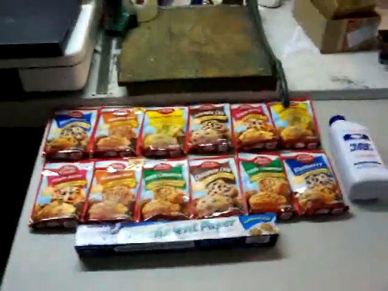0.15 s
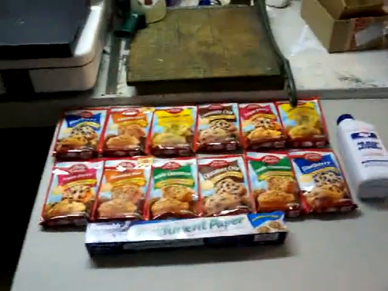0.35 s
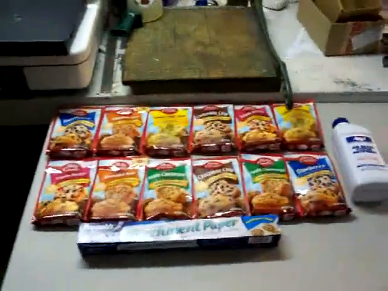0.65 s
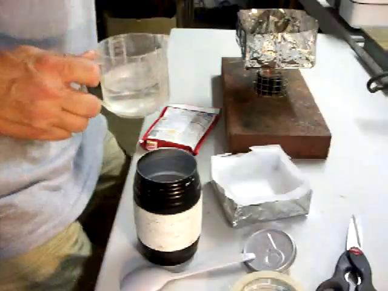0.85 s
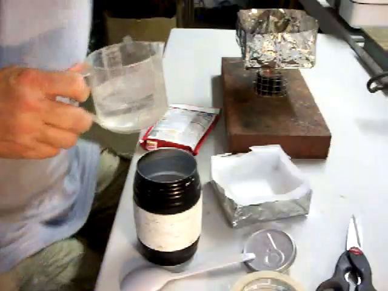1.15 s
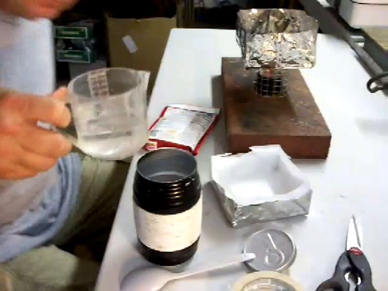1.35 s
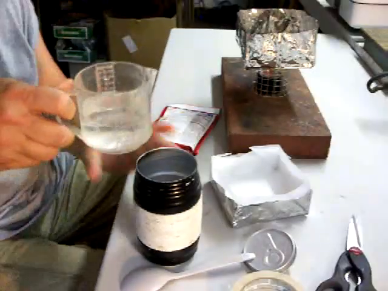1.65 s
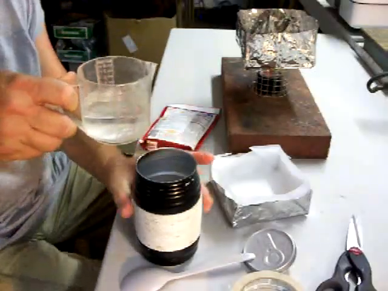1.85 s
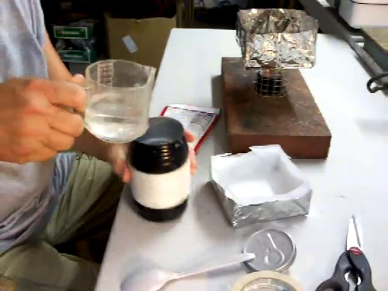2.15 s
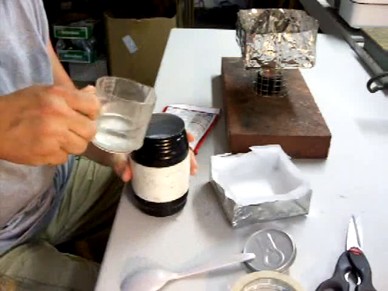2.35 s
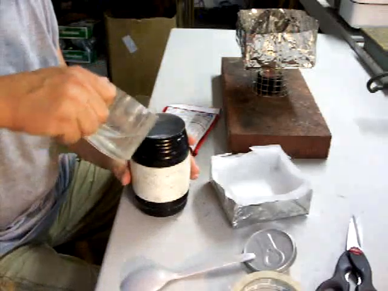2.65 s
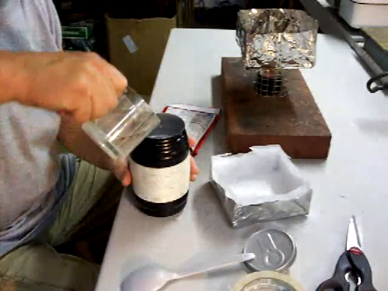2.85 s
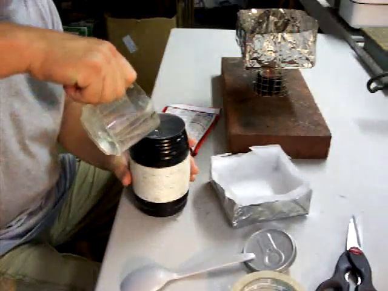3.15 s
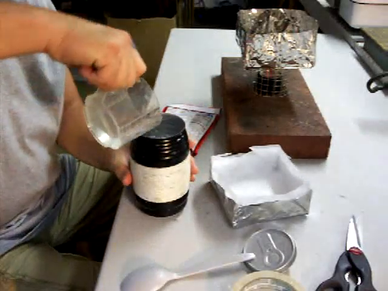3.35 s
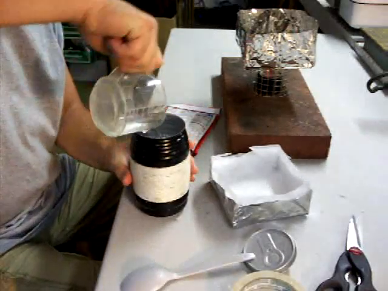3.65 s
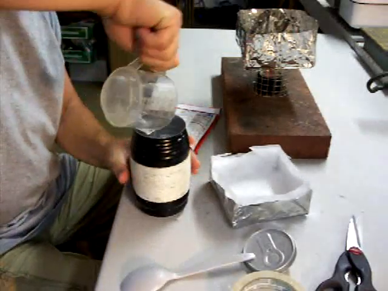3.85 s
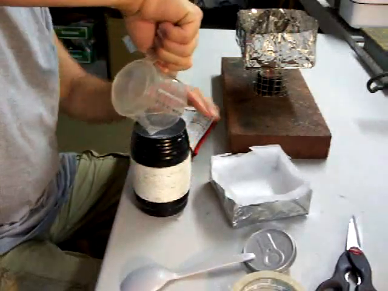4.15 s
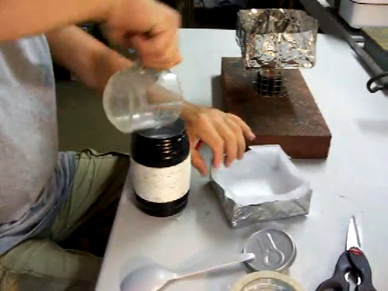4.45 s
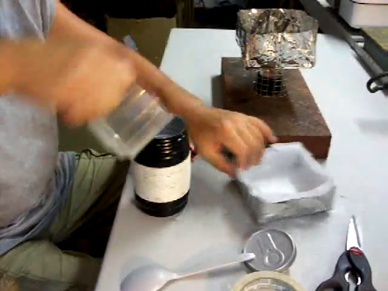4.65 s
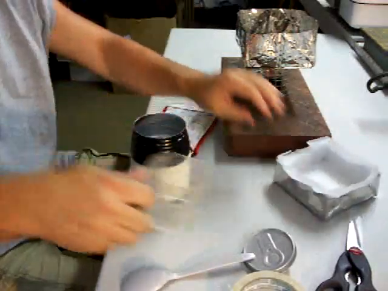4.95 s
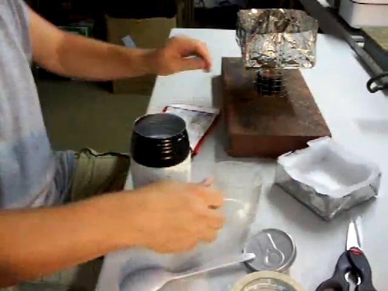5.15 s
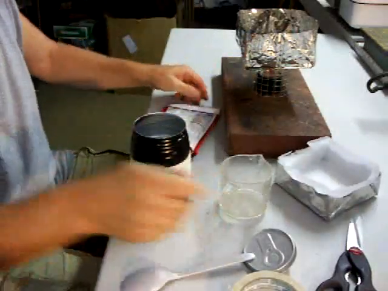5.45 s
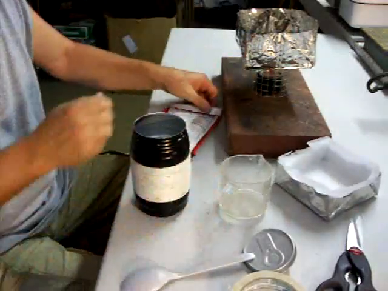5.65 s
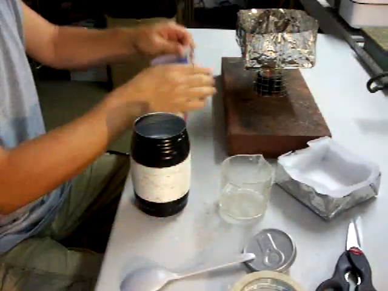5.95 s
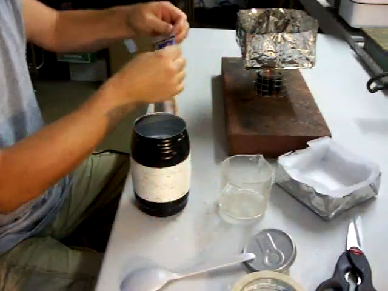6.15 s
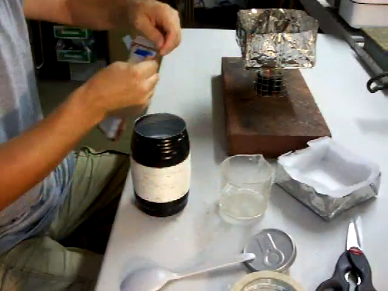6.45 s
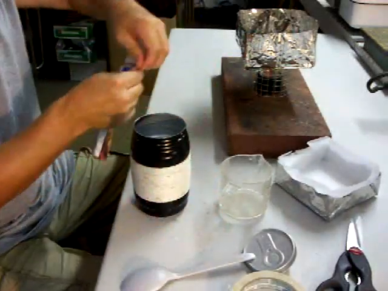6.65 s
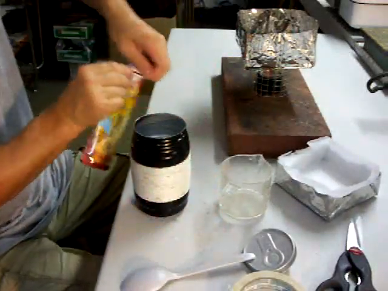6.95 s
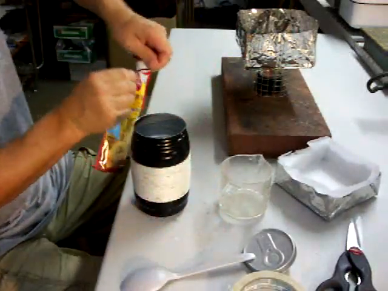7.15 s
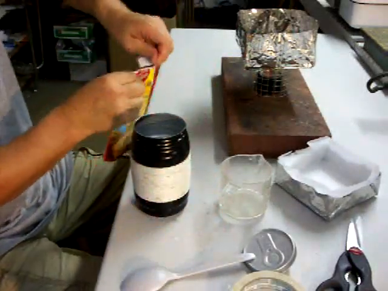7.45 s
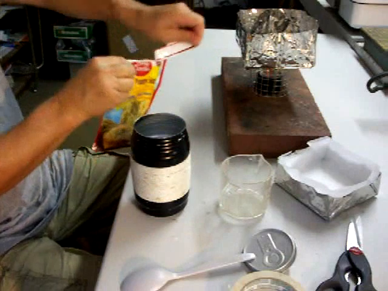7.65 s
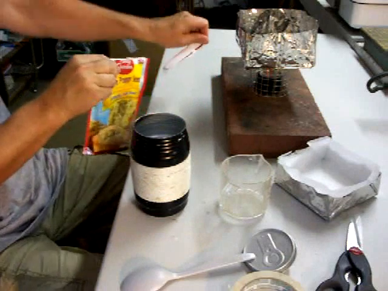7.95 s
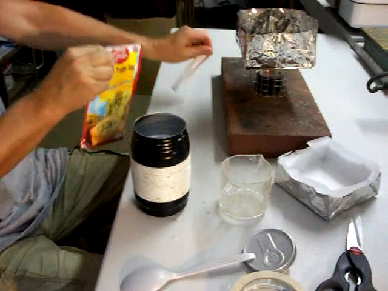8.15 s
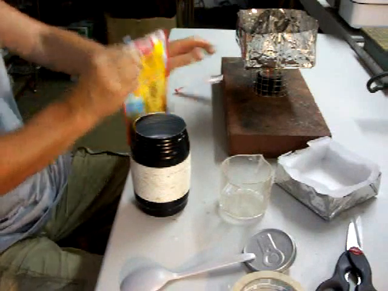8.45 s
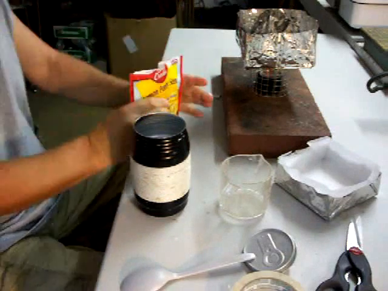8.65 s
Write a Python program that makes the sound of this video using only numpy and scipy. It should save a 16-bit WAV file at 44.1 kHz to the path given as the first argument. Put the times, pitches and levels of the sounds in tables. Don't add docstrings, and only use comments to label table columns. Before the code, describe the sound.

Over machine hum, a metal can scrapes and knocks on a table, water pours in, a foil pan scrapes, a plastic jug clatters down, a pouch tears.

```python
import sys
import numpy as np
from scipy import signal
from scipy.io import wavfile
from scipy.ndimage import uniform_filter1d

SR = 44100
rng = np.random.default_rng(int(sys.argv[2]) if len(sys.argv) > 2 else 0)


def volts_from_db(level):
    exponent = np.asarray(level, float) / 20
    return 10 ** exponent


def unload_audio(sound):
    columns = np.transpose(np.atleast_2d(sound))
    steps = np.round(np.clip(columns, -1, 1) * 32767)
    wavfile.write(sys.argv[1], SR, steps.astype(np.int16))


N = 387638
SCENE_CHANGE_S = .8005


def evened(x):
    return x / np.sqrt(np.mean(x ** 2) + 1e-20)


def add(mix, start_s, sound):
    part = mix[round(start_s * SR):][:len(sound)]
    part += sound[:len(part)]


def placed(start_s, sound):
    out = np.zeros(N)
    add(out, start_s, sound)
    return out


def coloured(x, spectrum):
    hz, db = np.transpose(spectrum)
    bins_hz = np.fft.rfftfreq(4096, 1 / SR)
    half = np.interp(np.log(bins_hz + 1), np.log(hz), db) * np.log(10) / 20
    log_gain = np.maximum(np.r_[half, half[-2:0:-1]], -11)
    phase = -signal.hilbert(log_gain).imag
    taps = np.fft.ifft(np.exp(log_gain + 1j * phase)).real
    return signal.oaconvolve(x, taps[:3000])[:len(x)]


def band(x, lo_hz, hi_hz, order=3):
    return signal.sosfilt(signal.butter(order, [lo_hz, hi_hz], "band", fs=SR, output="sos"), x)


def ring(hz, t60, size, rise=0.):
    t = np.arange(size) / SR
    return volts_from_db(-60 * t / t60) * np.sin(2 * np.pi * hz * t * (1 + rise * t / t60))


def rings(events, rise):
    out = np.zeros(N)
    for start_s, db, hz, t60 in events:
        add(out, start_s, volts_from_db(db) * ring(hz, t60, 9000, rise))
    return out


def grains(size, per_s, spread_db, cycles, rise, count):
    clumps = volts_from_db(2.2 * evened(uniform_filter1d(rng.standard_normal(size), 300)))
    heights = volts_from_db(spread_db * np.minimum(rng.exponential(1, size), 3.5))
    slips = heights * (rng.random(size) < per_s / SR) * clumps
    kind, out = rng.integers(0, count, size), np.zeros(size)
    for k, hz in enumerate(np.geomspace(180, 9500, count)):
        soft_start = np.minimum(np.arange(1500) * hz / SR * 4 / cycles, 1)
        template = ring(hz, 2 * cycles / hz, 1500, rise) * soft_start
        template *= np.sqrt(hz) / np.linalg.norm(template)
        out += signal.oaconvolve(slips * (kind == k), template)[:size]
    return evened(out)


def rubbing(rows, spectrum, split_hz, per_s, spread_db, cycles, smooth, rise=0., count=20):
    s, low_db, high_db = np.transpose(rows)
    t = np.arange(s[0], s[-1], 1 / SR)
    hiss = smooth * rng.standard_normal(len(t))
    body = coloured(grains(len(t), per_s, spread_db, cycles, rise, count) + hiss, spectrum)
    low = evened(band(body, 60, split_hz))
    high = evened(band(body, split_hz, 8130))
    both = volts_from_db(np.interp(t, s, low_db)) * low + volts_from_db(np.interp(t, s, high_db)) * high
    return s[0], both * signal.windows.tukey(len(t), 0.0029 / (s[-1] - s[0]))


def strokes(rows):
    s, db, bright_db, rise, fall = np.transpose(rows)[:, :, None]
    t = np.arange(np.floor(4 * s.min()) / 4 - .25, np.ceil(4 * s.max()) / 4 + .25, .001)
    force = volts_from_db(db - 20 * np.where(t < s, (s - t) / rise, (t - s) / fall))
    low = force.sum(0) + 1e-6
    high = (force * volts_from_db(bright_db)).sum(0) + 1e-6
    return np.c_[t, 20 * np.log10([low, high]).T]


def snaps(events, click_t60, fizz_db, width):
    out, t = np.zeros(N), np.arange(1500) / SR
    decay = volts_from_db(-60 * t / click_t60) + volts_from_db(fizz_db - 60 * t / 0.015)
    for (start_s, db, hz, low_db), noise in zip(events, rng.standard_normal((len(events), 1500))):
        burst = (noise + 5 * (t == 0)) * decay
        high = band(burst, hz / width, min(width * hz, 8300))
        low = band(burst, 790, 1300, order=1)
        add(out, start_s, volts_from_db(db) * (high / abs(high).max() + volts_from_db(low_db) * low / abs(low).max()))
    return out


def creases(events):
    rows = [(s, db - 2, hz, min(-38 - db, -10)) for s, db, hz in events]
    return snaps(rows, .008, -14, 1.6)


# time_s, gain_db
BACKGROUND_GAIN = [(0, 3), (.8, 3), (.81, 21), (2.2, 13.5), (3.0, 6), (5.3, 11), (5.7, 3), (6.6, -1),
                   (8.0, 6), (8.79, 5.5)]
# pitch_hz, density_db (per Hz)
AIR_BEFORE = [(15, -17), (25, -1), (166, -13.5), (220, -9.5), (283, -9.5), (1460, -20), (1660, -17.5),
              (1840, -21), (7370, -34.5), (10500, -49), (13600, -98)]
AIR_AFTER = [(15, -24), (25, 2.5), (70, -8), (150, -13.5), (194, -6.5), (276, -12), (1080, -19.5),
             (1660, -20), (1840, -23.5), (5870, -29), (10500, -45), (13600, -102.5)]
# pitch_hz, level_db
HUM_BEFORE = [(91.5, -45), (215.3, -42.5), (403.7, -47), (1620, -41.5), (2428, -54), (4290, -59),
              (5066, -63), (5120, -59.5)]
HUM_AFTER = [(72, -55), (189, -55.5), (346, -59), (435, -61.5), (1620, -56.5), (4290, -66.5)]


def workshop():
    t, out = np.arange(N) / SR, np.zeros(N)
    gain_db = np.interp(t, *np.transpose(BACKGROUND_GAIN))
    before = (AIR_BEFORE, -43.5, HUM_BEFORE, t < SCENE_CHANGE_S)
    after = (AIR_AFTER, -52, HUM_AFTER, t >= SCENE_CHANGE_S)
    for air, air_db, hum, on in (before, after):
        sound = volts_from_db(air_db) * evened(coloured(rng.standard_normal(N), air))
        for hz, hum_db in hum:
            waver = evened(uniform_filter1d(rng.standard_normal(N), 5000))
            level_db = hum_db - 4.0 + 0.65 * waver - 0.32 * gain_db * (hz > 1000)
            sound += volts_from_db(level_db) * np.sin(2 * np.pi * hz * t + 0.2 * np.roll(waver, 9000))
        out += sound * on
    return out * volts_from_db(gain_db)


def room(x):
    t = np.arange(16000) / SR
    echoes = rng.choice([-1., 1.], len(t)) * (rng.random(len(t)) < .06) * (t > .003)
    low = band(echoes, 48, 2600, order=2) * volts_from_db(-60 * t / 0.22)
    high = band(echoes, 1280, 7000, order=2) * volts_from_db(-60 * t / 0.14)
    tail = low + high
    return signal.oaconvolve(x, tail / np.linalg.norm(tail))[:N]


# pitch_hz, density_db (per Hz)
CLOTH_SPECTRUM = [(59, -47), (100, -31.5), (145, 8), (1230, -3.5), (1440, -6), (1890, -4.5), (3600, -9),
                  (6580, -15), (9340, -20.5), (10500, -75), (13600, -96)]
# peak_s, force_db, brightness_db, rise_s, fall_s
SLEEVE_STROKES = [
    (1.2, -41.5, 5, 0.025, 0.15),
    (1.53, -40.5, 6, 0.087, 0.072),
    (1.6, -47.5, 10.5, 0.24, .012),
]


def sleeve():
    return placed(*rubbing(strokes(SLEEVE_STROKES), CLOTH_SPECTRUM, 1300, per_s=3600, spread_db=2.0,
                           cycles=6.2, smooth=1.2))


# peak_s, stand_db, hand_db, brightness_db, fall_s
CAMERA_SHOVES = [
    [(.801, -18, -28, 0.5, 0.1), (.866, -13.5, -25, -4, 0.22), (.93, -20, -34.5, 10.5, 0.018),
     (1.03, -26.5, -35.5, -2, 0.26), (1.37, -25, -31.5, -13, 0.15), (1.49, -38, -23, -15, 0.061),
     (1.55, -39, -51, 2, 0.19), (1.822, -31.5, -35, -5, 0.14)],
    [(8.631, -19, -15.5, 1.5, 0.019), (8.65, -29, -30.5, 5, 0.31)],
]


def camera():
    out = np.zeros(N)
    for rows in CAMERA_SHOVES:
        s, stand_db, hand_db, bright_db, fall = np.transpose(rows)
        rise = np.minimum(.25 * fall, .6 * (s - s[0])) + .0005
        at, rock_db, _ = strokes(np.c_[s, stand_db, 0 * s, rise, fall]).T
        sway_db = strokes(np.c_[s, stand_db - 3, 0 * s, rise, 2.0 * fall])[:, 1]
        t = np.arange(at[0], at[-1], 1 / SR)
        noise = rng.standard_normal(len(t) + SR)
        sway = evened(band(noise, 7, 22, order=2)[SR:])
        rock = evened(band(noise, 30, 77, order=2)[SR:])
        rock = evened(rock + 1.2 * evened(band(noise, 42, 54, order=1)[SR:]))
        add(out, at[0], volts_from_db(np.interp(t, at, sway_db)) * sway + volts_from_db(np.interp(t, at, rock_db)) * rock)
        hands = strokes(np.c_[s, hand_db, bright_db, rise, fall])
        add(out, *rubbing(hands, CLOTH_SPECTRUM, 1020, per_s=4000, spread_db=4.0, cycles=6, smooth=1.4))
    return out


# start_s, level_db, pitch_hz, slips
CREAK_EVENTS = [(0.801, -18.5, 1840, 1), (0.8448, -12, 1900, 5), (4.7341, -15, 2180, 2),
                (4.7533, -15.5, 1270, 1), (4.962, -21, 1360, 3), (6.19, -27.5, 1550, 4),
                (7.054, -23, 1500, 1), (7.074, -28, 1550, 2), (8.629, -16, 1420, 1)]


def creaks():
    slips = []
    for s, db, hz, count in CREAK_EVENTS:
        for k in range(round(count)):
            slips.append((s + k * .0082, db - 2 * k, hz, min(-22 - db, -3)))
    return snaps(slips, 0.051, -9, 1.15)


# start_s, level_db, pitch_hz
TICK_EVENTS = [(0.8482, -14.5, 3600), (0.8778, -23, 3800), (0.9285, -12, 3300), (1.0249, -18, 3100.0),
               (1.102, -27.5, 4500.0), (1.2004, -26, 2200.0), (2.108, -25, 4170), (2.2554, -30, 2200.0),
               (2.497, -27, 4560), (2.217, -30, 4500), (2.5566, -30, 4100.0), (2.6577, -34, 6400.0),
               (2.672, -29, 3900.0), (2.7478, -23.5, 4470), (2.7804, -33, 3600.0), (0.8088, -24, 3200),
               (4.2322, -25, 3600.0), (4.2763, -31, 3600.0), (4.293, -25, 3750)]


def ticks():
    return creases(TICK_EVENTS)


# pitch_hz, density_db (per Hz)
FILM_SPECTRUM = [(88, -70), (150, -14.5), (452, -5.5), (717, -8), (798, -6), (919, -6.5), (6610, -12),
                 (8640, -17.5), (10500, -18.5), (13600, -91)]
# peak_s, force_db, brightness_db, rise_s, fall_s
POUCH_STROKES = [(5.81, -44, -3, 0.012, 0.2), (5.884, -51, 13.5, 0.0053, 0.069),
                 (6.575, -57.5, 6, 0.033, 0.15), (6.79, -69, 5, .004, 0.066),
                 (6.942, -52.5, 20.5, 0.002, 0.018), (6.963, -32, 4.5, 0.0046, 0.081),
                 (7.052, -36, 2, 0.022, 0.26), (7.253, -43.5, 7, 0.0037, 0.059),
                 (7.55, -40, 0, 0.0026, 0.017), (7.685, -33.5, -0.5, 0.095, 0.25),
                 (7.9, -56, 22.5, 0.22, 0.093), (7.96, -32, -1, 0.0061, 0.021),
                 (8.412, -33.5, -6.5, 0.0015, 0.03), (8.517, -48, 4, 0.053, 0.14)]
# pitch_hz, density_db (per Hz)
DRAG_SPECTRUM = [(88, -59), (150, -27), (270, 4.5), (569, -3.5), (1100, 0), (1380, 8), (1800, -4),
                 (2970, -18.5), (5070, -11), (7360, -24), (10500, -20), (13600, -68)]
# peak_s, force_db, brightness_db, rise_s, fall_s
DRAG_STROKES = [(6.09, -34, -6.5, 0.094, 0.13), (6.155, -36, 8, 0.026, 0.094),
                (6.195, -38.5, 11, 0.06, 0.11), (6.382, -50.5, 1, 0.0098, 0.095)]
# start_s, level_db, pitch_hz
LIFT_SNAPS = [(5.96, -36, 1500), (5.7986, -23, 1800), (5.8368, -23, 2200.0), (5.864, -26, 5100.0),
              (5.8824, -5.5, 4650), (5.8824, -18, 1600), (6.153, -21, 4900.0), (6.1718, -15, 4700.0),
              (6.1852, -9.5, 5600.0), (6.199, -18, 5400.0), (6.2072, -18, 5600.0), (6.2162, -17, 5000.0),
              (6.2328, -17, 4600.0), (6.242, -11, 4700.0), (6.2534, -19, 4600.0), (6.2602, -11, 4700.0),
              (6.2666, -16, 4700.0), (6.3183, -26, 2900.0), (6.3279, -16, 4400.0), (6.381, -28.0, 3720),
              (6.3953, -22.5, 3430)]
TORN_SNAPS = [(6.786, -35, 4470), (6.9404, -18, 4000), (6.9612, -7.5, 4400), (6.9726, -21, 5800),
              (6.99, -17, 6800.0), (7.0174, -25, 5000.0), (7.0433, -29, 2600.0), (7.0543, -16.5, 2200.0),
              (7.0738, -25, 5000), (7.1048, -12.5, 4700), (7.121, -18, 2200.0), (7.1318, -6.5, 3750),
              (7.2115, -28, 5000.0), (7.2175, -27, 4900.0), (7.252, -23, 2500.0), (7.2606, -15.5, 5270),
              (7.339, -33, 2600.0), (7.5507, -31.0, 2200.0), (7.5939, -28, 4400.0), (7.6057, -29, 3700.0),
              (7.618, -20, 2200.0), (7.6332, -12, 5800.0), (7.66, -33, 2200.0), (7.6794, -17, 4300.0),
              (7.687, -20, 4100.0), (7.6986, -14, 4800.0), (7.7181, -18, 4300.0), (7.7353, -18, 4500.0),
              (7.7482, -12.5, 7600.0), (7.7839, -17, 6200.0), (7.79, -19, 5700.0), (7.196, -25, 2000),
              (7.8448, -35, 3100.0), (7.853, -27, 4100.0), (7.901, -21, 6400.0), (7.9334, -17, 2080),
              (7.9596, -9, 5070), (8.129, -28, 4460), (8.321, -29, 4570), (8.4117, -26.5, 2200.0),
              (8.491, -27, 5200.0), (8.5222, -33, 6100.0), (8.5984, -30, 2200.0), (8.646, -7, 4000.0),
              (8.6739, -14, 3200.0), (8.6907, -15, 4300.0)]


def pouch():
    out = placed(*rubbing(strokes(DRAG_STROKES), DRAG_SPECTRUM, 2470, per_s=2900, spread_db=1.0,
                          cycles=3.8, smooth=1.3))
    add(out, *rubbing(strokes(POUCH_STROKES), FILM_SPECTRUM, 2020, per_s=3000, spread_db=2.5,
                      cycles=4.9, smooth=.8))
    return out + creases(LIFT_SNAPS) + creases(TORN_SNAPS)


# pitch_hz, density_db (per Hz)
PAN_SPECTRUM = [(60, -43), (134, -13), (222, -1), (300, -7.5), (1150, -8.5), (1330, 6), (1560, -3.5),
                (2150, -5.5), (2370, -2), (2700, -9), (4100, -8.5), (5800, -7.5), (7000, -11.5),
                (9200, -13.5), (13600, -79)]
# peak_s, force_db, brightness_db, rise_s, fall_s
PAN_STROKES = [(4.53, -59.5, 13, .08, .08), (4.64, -40.5, 7, 0.058, 0.23), (4.75, -32.5, 11.6, 0.082, 0.22),
               (4.887, -29, 5.5, 0.0073, 0.046), (4.975, -24, 0.4, 0.12, 0.15)]
# start_s, level_db, pitch_hz
PAN_SNAPS = [(4.4861, -28, 5000.0), (4.5354, -27, 5600.0), (4.6301, -38, 2300.0), (4.684, -20, 4000.0),
             (4.696, -14, 2200.0), (4.7402, -8.5, 2400.0), (4.753, -8, 5800.0), (4.8398, -8, 6200),
             (4.848, -12, 2200.0), (4.8684, -7, 5900.0), (4.8875, -3, 5800), (4.896, -7, 5800),
             (4.905, -5.5, 4600.0), (4.923, -22, 6800.0), (4.939, -9, 6200.0), (4.9543, -16, 2130),
             (4.9624, -9.5, 2200.0), (4.9745, -7, 5600), (5.0085, -13, 6000), (5.018, -18, 6000),
             (5.0579, -23, 6000)]


def foil_pan():
    scrape = rubbing(strokes(PAN_STROKES), PAN_SPECTRUM, 590, per_s=2600, spread_db=1.5, cycles=6, smooth=1.1)
    return placed(*scrape) + creases(PAN_SNAPS)


# pitch_hz, density_db (per Hz)
SPRAY_SPECTRUM = [(180, -6.5), (300, -22), (404, -14.5), (544, -12.5), (690, -18), (1090, -15.5),
                  (2300, -8), (4110, -9.5), (6620, -9.5), (9050, -11.5), (10500, -19), (13600, -78)]
# time_s, spray_db
STREAM = [(3.057, -79), (3.12, -48), (3.335, -43.5), (3.38, -37.5), (3.55, -37.5), (3.75, -35),
          (3.88, -41.5), (3.93, -32.5), (4.05, -42), (4.17, -40.5), (4.23, -56), (4.35, -55)]


def spray():
    s, spray_db = np.transpose(STREAM)
    air_db = -51 + .3 * (spray_db - spray_db.max()) + 7 * (s - s[0])
    return placed(*rubbing(np.c_[s, air_db, spray_db], SPRAY_SPECTRUM, 1100, per_s=5000, spread_db=2.7,
                           cycles=44, smooth=.7, rise=.1, count=70))


# start_s, level_db, pitch_hz
DROP_BUBBLES = [(3.1144, -29, 7480), (3.1306, -31.5, 3660), (3.39, -31.5, 1720), (3.1706, -23, 7490.0),
                (3.2031, -26.5, 4120), (3.2056, -34, 4960), (3.347, -23.5, 5740), (3.3478, -27.5, 4940),
                (3.3728, -28.0, 5730.0), (3.3738, -27.0, 3620), (3.3743, -33, 4850), (3.3877, -31, 4260.0),
                (3.388, -28, 5470), (3.4089, -29, 2140), (3.4192, -19.5, 6460), (3.4354, -27.0, 3150),
                (3.4356, -24, 7450), (3.4417, -23.5, 5540), (3.4556, -32, 2830), (3.51, -33, 2400),
                (3.4695, -22.5, 7180), (3.4705, -22.5, 5640.0), (3.503, -26.5, 2960), (3.5389, -29, 5940.0),
                (3.5393, -27, 7130), (3.562, -26, 3750), (3.571, -34, 1750), (3.5718, -32, 2480),
                (3.5728, -25, 5250.0), (3.5923, -24, 6400), (3.5928, -27, 5130), (3.5933, -26, 2970.0),
                (3.6102, -23.5, 6600), (3.6312, -25, 5800), (3.633, -33, 4700), (3.6357, -29, 2150.0),
                (3.6426, -33, 3370), (3.687, -26, 6700), (3.697, -27.5, 1830), (3.7584, -28, 6030),
                (3.788, -31, 4300), (3.8038, -31, 2760.0), (3.8242, -26.0, 6140), (3.9016, -35, 6700),
                (3.9023, -22.5, 4730), (3.9055, -30, 5940.0), (3.914, -25.5, 7070), (3.915, -31, 1880),
                (3.918, -26, 5940), (3.9255, -30, 2320), (4.0874, -31, 4690.0), (4.1716, -34, 1820),
                (4.1183, -19, 3320), (4.1455, -30, 5200), (4.146, -29, 7110.0), (4.1685, -28.5, 3330)]
# start_s, level_db, pitch_hz
LARGE_BUBBLES = [(3.352, -30, 2750), (3.455, -33, 2700), (3.5987, -35, 1900), (3.67, -32, 1250),
                 (3.8448, -29, 1440), (3.877, -30, 1390), (3.955, -28, 2800), (3.97, -30, 1890),
                 (4.0038, -26.5, 1550), (4.075, -26, 1940)]


def splashes():
    out = np.zeros(N)
    soft = np.minimum(np.arange(3000) / SR / .001, 1)
    for (start_s, db, hz), chance in zip(DROP_BUBBLES, rng.random((len(DROP_BUBBLES), 3, 2))):
        cluster = ring(hz, .03, 3000, rise=0.011) * soft
        for delay, pitch in chance:
            near_hz = min(hz * (.8 + .45 * pitch), 9000)
            add(cluster, .004 * delay, volts_from_db(-5) * ring(near_hz, .02, 2000, rise=.02))
        add(out, start_s, volts_from_db(db + 1.5) * cluster)
    out += rings([(s, db - 2.5, hz, 65 / hz) for s, db, hz in LARGE_BUBBLES], .03)
    splats = [(s, db - .5, hz, -30) for s, db, hz in DROP_BUBBLES]
    return out + snaps(splats, 0.053, -28, 1.64)


# start_s, level_db, pitch_hz
PLOP_EVENTS = [(3.074, -28.5, 488), (3.213, -30, 500), (3.374, -28, 456), (3.571, -33.5, 507),
               (3.697, -35.5, 894), (3.77, -36, 790), (3.844, -31, 890), (4.092, -35, 597),
               (3.944, -28, 584), (4.003, -30, 616), (4.057, -31, 560), (4.135, -21.5, 524)]
# delay_s, level_db, pitch_ratio
PLOP_BUBBLES = [(0, -1, 1), (.011, -6, .86), (.032, -7, 1.08), (.05, -11, .97)]


def plops():
    gulps = [(s + lag, db + gulp_db, hz * ratio) for s, db, hz in PLOP_EVENTS
             for lag, gulp_db, ratio in PLOP_BUBBLES]
    return rings([(s, db, hz, 27.6 / hz) for s, db, hz in gulps], 0.031)


# start_s, level_db, pitch_hz, t60_s
SINGLE_RINGS = [(.801, -9.5, 156, .075), (1.06, -10, 207, .021), (1.375, -29, 143, .16),
                (2.035, -22, 180, .3), (2.054, -29, 5470, .06), (2.349, -24, 2900, .03),
                (2.352, -36, 6950, .06), (2.353, -36, 7600, .08), (2.353, -40, 8400, .08),
                (2.841, -30, 180, .067), (8.630, -14, 411, .055), (8.643, -10.5, 58, .24),
                (5.375, -42, 3660, .2), (5.375, -45, 3705, .2), (5.454, -31, 4820, .05),
                (5.386, -14, 420, .03), (5.409, -11, 400, .025), (5.4135, -9, 250, .03)]


def lone_modes():
    return rings(SINGLE_RINGS, 0)


# pitch_hz, density_db (per Hz)
CAN_SPECTRUM = [(59, -46), (100, -24), (173, 2), (431, -6.5), (523, 1.5), (743, -10.5), (819, -4.5),
                (1650, -31.5), (5630, -35), (10500, -43), (13600, -95)]
# peak_s, force_db, brightness_db, rise_s, fall_s
CAN_STROKES = [
    (1.984, -26, -6, 0.015, 0.059),
    (2.047, -14, -10, 0.03, 0.042),
]


def can_slide():
    return placed(*rubbing(strokes(CAN_STROKES), CAN_SPECTRUM, 1200, per_s=2500, spread_db=2.2,
                           cycles=4, smooth=1.1))


def knocks(events, modes, rattle, rattle_db, rattle_t60):
    out, t = np.zeros(N), np.arange(14000) / SR
    chances = rng.uniform(-1.0, 1, (len(events), len(modes), 2))
    for (start_s, db, bright_db, length), chance in zip(events, chances):
        hit = np.zeros(len(t))
        for (hz, mode_db, t60), pair in zip(modes, chance):
            for c in pair:
                tone = ring(hz * (1 + 0.011 * c), t60 * length, len(t))
                hit += volts_from_db(mode_db + bright_db * (hz > 1000)) * tone
        decay = volts_from_db(-60 * t / (rattle_t60 * length)) + volts_from_db(8.5 - 60 * t / 0.022)
        shake = band(coloured(rng.standard_normal(len(t)) * decay, rattle), 530, 11000, order=1)
        both = -hit / abs(hit).max() + volts_from_db(rattle_db + bright_db) * shake / abs(shake).max()
        both -= 1.2 * ring(552, 0.0082, len(t))
        add(out, start_s + .0012, volts_from_db(db) * band(both, 160, 8800, order=2))
    return out


# start_s, level_db, brightness_db, length_ratio
JUG_BLOWS = [(5.211, -22.5, 13.5, 0.79), (5.34, -2.5, 2.5, 0.93), (5.346, -26, -10, 0.71),
             (5.421, -3, -0.5, 0.63), (5.4262, -13, -5, 0.28), (5.443, -7, -2, 0.37), (5.4505, -3, 1, 0.24),
             (5.456, -6, 9.5, 0.6), (5.475, -10.5, 3, 0.4)]
# pitch_hz, level_db, t60_s
JUG_MODES = [(211, -5, 0.045), (249, 4, 0.26), (345, -10, 0.36), (391, 10.5, 0.11), (560, -12, 0.17),
             (605, 0.5, 0.2), (782, -8, 0.22), (950, -16, 0.11), (1210, -4, 0.065), (2900, -22, 0.19),
             (3800, -29, 0.38), (5940, -22, 0.18)]
# pitch_hz, density_db (per Hz)
JUG_SPECTRUM = [(71, -29), (120, -38), (231, -11), (300, -36), (376, -8), (600, -19), (922, -23.5),
                (1150, -25.5), (3000, -27.5), (3500, -35), (5990, -33), (10500, -46.5), (13600, -103)]
# peak_s, force_db, brightness_db, rise_s, fall_s
JUG_WOBBLES = [
    (5.355, -18, -28, 0.0067, 0.1),
    (5.412, -23, -23, 0.05, 0.011),
]


def jug():
    wobble = rubbing(strokes(JUG_WOBBLES), JUG_SPECTRUM, 890, per_s=1000, spread_db=1.0, cycles=3.0, smooth=1.6)
    return placed(*wobble) + knocks(JUG_BLOWS, JUG_MODES, JUG_SPECTRUM, -11.5, 0.31)


# start_s, level_db, brightness_db, length_ratio
CAN_BLOWS = [(1.979, -22, -2, .3), (2.032, -16, -9, 0.25), (2.046, -8, -5.5, 0.36), (2.292, -2.5, 5, 0.43),
             (2.341, -6.5, -9, 0.64), (2.355, -22, 16, 0.72), (2.844, -37.5, 0, 0.87)]
# pitch_hz, level_db, t60_s
CAN_MODES = [(163, -5, 0.66), (210.6, 3.5, 0.32), (266, -5.5, 0.41), (347, -4, 0.41), (524, 6, 0.056),
             (590, 6, 0.066), (680, -12, 0.2), (810, -11, 0.1), (1124, 2.5, 0.096), (1250, -2, 0.12),
             (4050, 4.5, 0.058), (5560, 3.5, 0.045)]
# pitch_hz, density_db (per Hz)
CAN_RATTLE_SPECTRUM = [(71, -28), (120, -13), (195, 6.5), (273, -43.5), (336, 11), (420, -3.5), (659, -2),
                       (1010, -20.5), (1180, -17.5), (5660, -32.5), (10500, -44), (13600, -103.5)]


def can_knocks():
    return knocks(CAN_BLOWS, CAN_MODES, CAN_RATTLE_SPECTRUM, -3.5, 0.36)


def scene():
    table = sleeve() + creaks() + ticks() + pouch() + foil_pan()
    table += spray() + splashes() + plops()
    table += lone_modes() + can_slide() + jug() + can_knocks()
    return (table + volts_from_db(-12.5) * room(table) + camera() + workshop())[None]


def roll_off(x):
    return signal.sosfilt(signal.butter(12, 17000, fs=SR, output="sos"), x)


def record(dry):
    heard = np.clip(signal.sosfilt(signal.butter(4, 8200, fs=SR, output="sos"), dry), -1, 1)
    heard = signal.oaconvolve(heard, signal.firwin(255, 10200, window=("kaiser", 9), fs=SR)[None], "same")
    add(heard[0], SCENE_CHANGE_S, -.22 * np.exp(-np.arange(400) / 90))
    return roll_off(np.clip(heard, -1, 1))


dry = scene()
out = record(dry)
unload_audio(out)
```